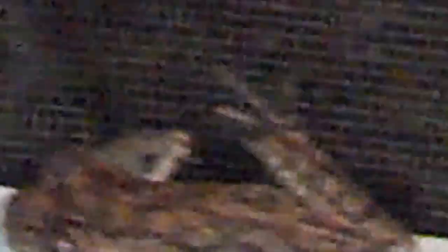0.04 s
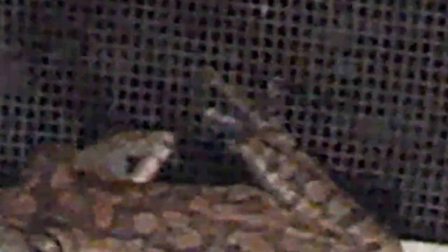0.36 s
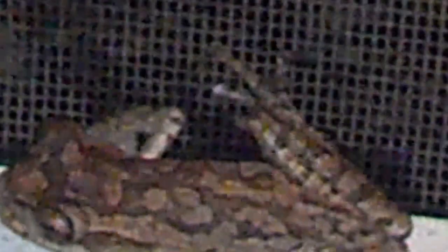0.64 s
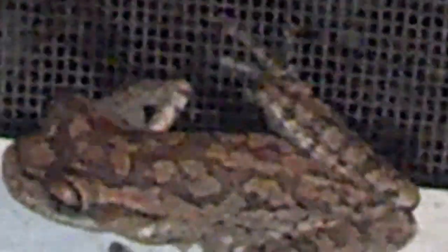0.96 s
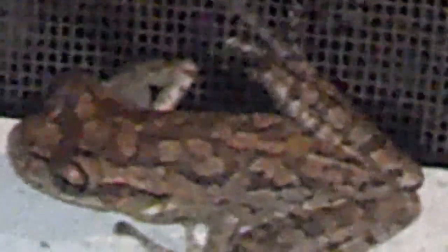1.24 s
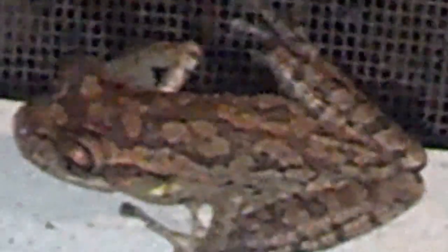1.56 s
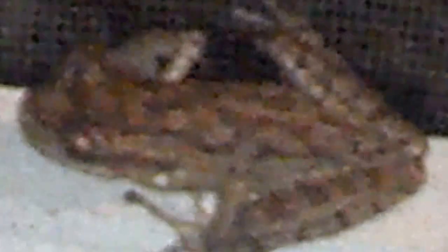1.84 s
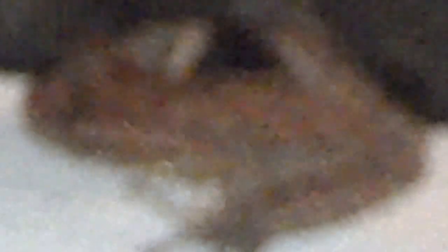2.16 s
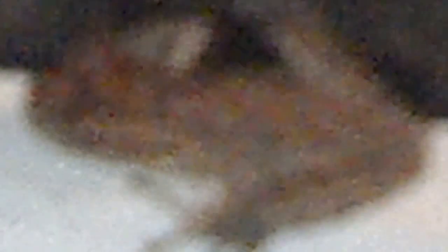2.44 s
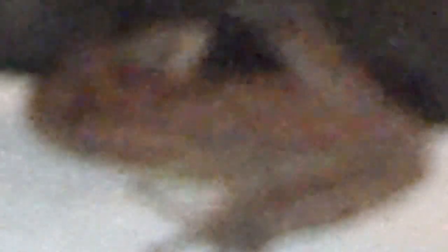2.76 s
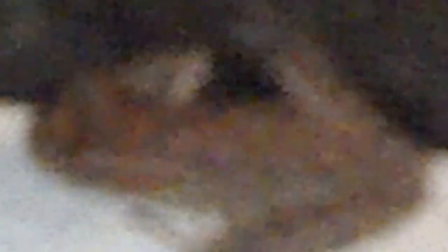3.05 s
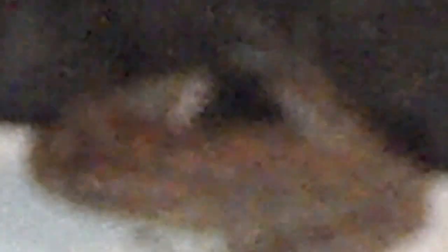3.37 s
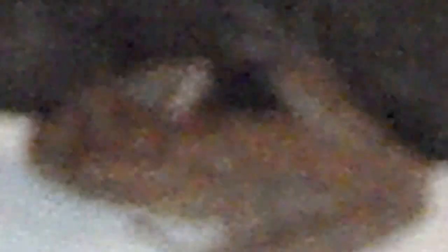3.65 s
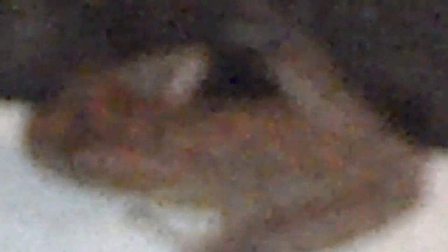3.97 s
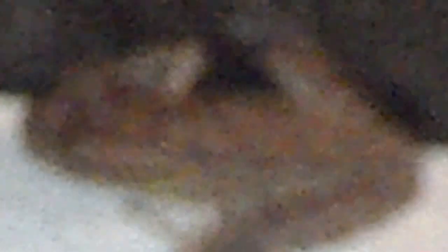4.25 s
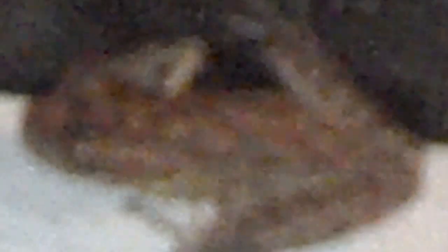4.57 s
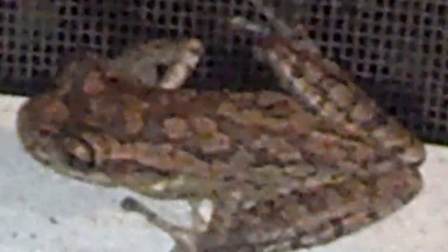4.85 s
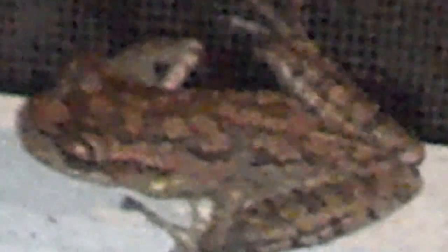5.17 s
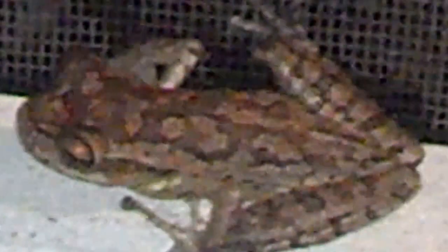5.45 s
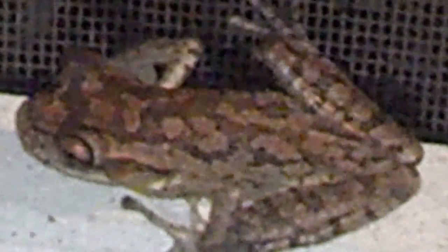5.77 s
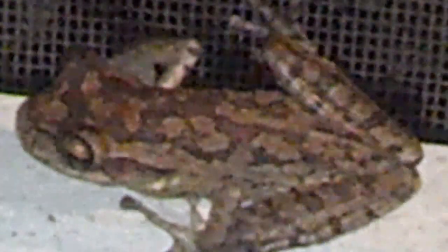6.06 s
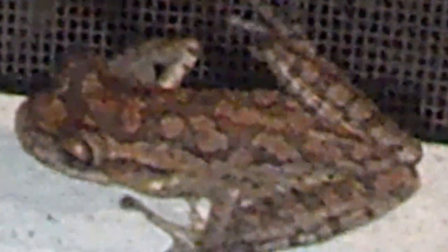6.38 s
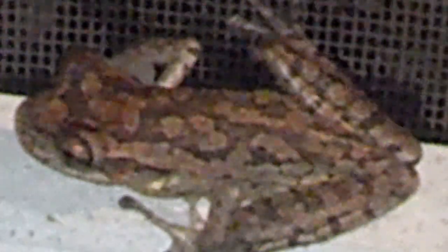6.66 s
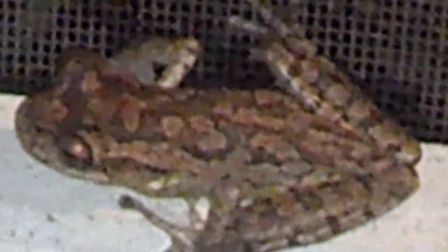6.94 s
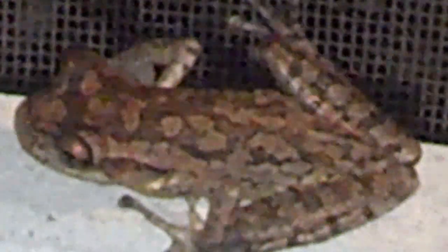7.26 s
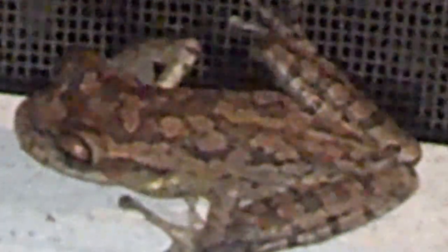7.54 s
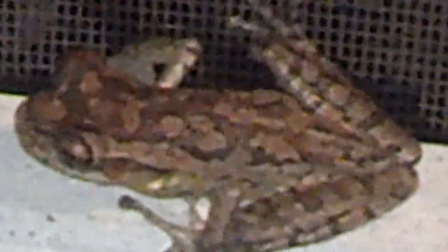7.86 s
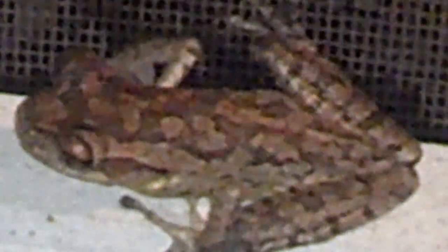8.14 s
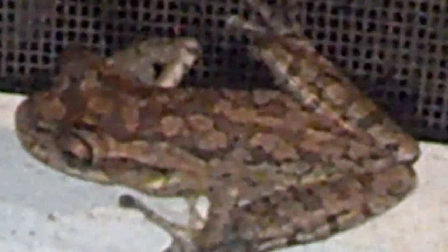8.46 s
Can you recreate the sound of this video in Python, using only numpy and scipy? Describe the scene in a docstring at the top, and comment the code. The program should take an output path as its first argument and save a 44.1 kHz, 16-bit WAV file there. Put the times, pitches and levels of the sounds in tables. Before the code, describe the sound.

A high chorus of crickets trills throughout, swelling about three times a second over a low, quiet outdoor rumble. Tree frogs, nearer the microphone, give short bursts of raspy pulsed notes with pauses between them. Later come brief squeals and separate croaks, until the frogs call almost without a break. House walls add a short echo, and faint ticks and distant peeps dot the night air.

```python
"""A yard by a screened porch at night: tree frogs call in runs of rasping notes, low rising croaks and
a few squeals. Each note is a train of pulses from the voice box that rings the vocal sac, the frog's
throat balloon; the house walls throw the sound back. Behind them a chorus of crickets rubbing their
wings swells about three times a second over a soft rumble, with far peeps and faint ticks nearby."""
import sys
import numpy as np
from scipy import signal
from scipy.fft import rfft, irfft, next_fast_len
from scipy.io import wavfile
from scipy.ndimage import uniform_filter1d

SR = 44100
rng = np.random.default_rng(int(sys.argv[2]) if len(sys.argv) > 2 else 0)


def put_to_file(sound):
    """Save the sound as 16-bit audio at rate SR, in the file named by the first command-line argument."""
    columns = np.atleast_2d(sound).T  # one column per channel
    safe = np.clip(columns, -1, 1)
    whole_steps = np.round(safe * 32767)
    wavfile.write(sys.argv[1], SR, whole_steps.astype(np.int16))


N = 375291
TIME = np.arange(N) / SR

# how the vocal sac rings; the lower its tone, the slacker it is:
# (sac tone [Hz], body boom [dB], share of pure tone [0-1], width of the resonance [Hz])
SAC = [(1020, -1, 0.11, 520), (1200, -16, 0.17, 260), (1510, -26, 0.28, 310), (1720, -27, 0.54, 147),
       (1860, -41, 0.41, 80), (2150, -29, 0.17, 250)]


def frog_calls(lead_s=0.004, croak_rasp_db=0.5, croak_ring_db=-2):
    """All the notes and croaks; how tight the sac is sets their loudness, rasp and high ring."""
    # lone croaks: (start [s], length [s], first sac tone [Hz], last sac tone [Hz], level [dB])
    lone_croaks = [(0.863, 0.051, 1118, 1194, -56.5), (1.048, 0.065, 1600, 1700, -62),
                   (4.726, 0.043, 1835, 1916, -49), (5.754, 0.057, 1279, 1350, -43.5),
                   (6.817, 0.07, 1760, 1710, -41.5), (6.888, 0.035, 1730, 1754, -45),
                   (7.303, 0.077, 1410, 1680, -41), (7.481, 0.049, 1720, 1723, -47.5),
                   (7.545, 0.065, 1718, 1840, -44.5), (7.608, .115, 1413, 1720, -42),
                   (7.699, 0.033, 1850, 1952, -46), (7.783, .059, 2137, 2110, -40.5),
                   (8.004, 0.035, 1883, 1896, -40), (8.092, 0.05, 1760, 1874, -44),
                   (8.477, 0.056, 1353, 1625, -39.5)]
    # the sac is loudest in mid range; when tighter, it tends to rasp and ring more:
    # (sac tone [Hz], level change [dB], rasp [dB], high ring [dB])
    tension = [(1150, -3, -12, -19), (1480, -7, -12.5, -29), (1600, 0, -11, -23), (1730, 0.5, -13, -17.5),
               (1850, -1, -12.5, -13), (1906, -1, -8.5, -10), (2030, -5.5, -3, -15), (2150, -5.5, -12, -5)]
    out = np.zeros(N)
    calls = list(note_runs()) + [(*row, croak_rasp_db, croak_ring_db) for row in lone_croaks]
    for start, length, start_hz, end_hz, level_db, extra_rasp_db, extra_ring_db in calls:
        sac_db, rasp_db, ring_db = curves(tension, (start_hz + end_hz) / 2)
        sound = frog_note(length, start_hz, end_hz, rasp_db + extra_rasp_db, ring_db + extra_ring_db)
        add(out, start - lead_s, from_db(level_db + sac_db) * sound)
    return out


def note_runs(first_note_s=0.063, shorten_s=0.003, opener_db=-6, tiring_db=0.4, pitch_rise=0.014):
    """A frog starts a run softly, pushes hardest on note two, then tires; each note bends up a little."""
    # runs of notes: (start [s], note spacing [s], level [dB], extra rasp [dB], extra high ring [dB],
    # sac tone of each note [Hz])
    runs = [(-0.04, 0.084, -41.5, -2.5, -2, [1620, 1490, 1490]),
            (1.43, 0.1, -42.5, 1, 5, [1618, 2008, 1894, 1694]),
            (2.70, 0.1, -41, 1, 1.5, [1700, 1923, 1918, 1740]),
            (4.835, .100, -42, -1.5, 0, [1573, 1755, 1617, 1610]),
            (5.905, .100, -41, -1, 0.5, [1618, 1789, 1719, 1710, 1835]),
            (6.94, .101, -41.5, 0.5, 2.5, [1594, 1850, 1700, 1767]),
            (8.195, 0.099, -41, 2, 4, [1520, 1860, 1905])]
    for start, spacing, level_db, rasp_db, ring_db, tones in runs:
        for k, tone_hz in enumerate(tones):
            effort_db = opener_db if k == 0 else -tiring_db * (k - 1)
            bend_hz = tone_hz * pitch_rise / 2
            yield (start + k * spacing, first_note_s - k * shorten_s,
                   tone_hz - bend_hz, tone_hz + bend_hz, level_db + effort_db, rasp_db, ring_db)


def frog_note(length, start_hz, end_hz, rasp_db, ring_db, attack_s=0.0082, release_s=0.011, swell=0.15):
    """Pulses from the voice box set the sac, the body and a much higher tone ringing."""
    # tone colour of the rasp: (frequency [Hz], level [dB])
    rasp_colour = [(300, -26), (800, 0.5), (1300, -32.5), (1800, -3), (2300, 11), (2900, 2.5), (3400, 1.5),
                   (3900, -4), (4700, -17), (5500, -32), (8000, -38)]
    t = np.arange(int(SR * (length + 0.035))) / SR
    body_db, pure_share, width_hz = curves(SAC, (start_hz + end_hz) / 2)
    # a slack sac fills slowly: a low croak swells in and bends upward
    slack = np.interp(start_hz, [1250, 1650], [1, 0])
    tone_hz = np.interp(t, [0, length], [start_hz, end_hz]) * (1 - 0.11 * slack * np.exp(-t / 0.018))
    pulses = voice_box(tone_hz, t)
    # a tight sac rings on from pulse to pulse as a nearly pure tone
    tone = np.sqrt(2) * np.sin(wavering_phase(tone_hz, t, waver=0.015, per_s=216))
    buzz = band(resonance(pulses, tone_hz, width_hz), 0.65 * start_hz, max(1.11 * end_hz, 2000))
    sac = rms_one(np.sqrt(pure_share) * tone + np.sqrt(1 - pure_share) * buzz)
    body = from_db(body_db) * band(pulses, 445, 1360)
    rasp = from_db(rasp_db - 0.5) * coloured(pulses, rasp_colour)
    ring_hz = rng.normal(4480, 28)
    ring = from_db(ring_db - 4.5) * band(resonance(pulses, ring_hz, width_hz=71), 3740, 4700)
    # the push of air fades in, bulges in the middle and fades out
    fade_in = np.clip(t / (attack_s * (1 + 0.7 * slack)), 0, 1)
    fade_out = np.clip((length - t) / release_s + 0.76, 0, 1)
    bulge = 1 - swell / 2 + swell * np.sin(np.pi * np.minimum(t / length, 1)) ** 2
    push = fade_in * fade_out * bulge
    # the high ring builds up with the push and lingers after it
    linger = np.clip(t / attack_s, 0, 1) * np.exp(-np.maximum(t - length, 0) / 0.013)
    return shaped(sac, push) + (body + rasp) * push + ring * linger


def voice_box(tone_hz, t, cycles_per_pulse=13, jitter=0.016, breath=0.7):
    """Slightly uneven clicks, each with a puff of breath, blurred by the leaves."""
    pulse_count = np.cumsum(tone_hz / cycles_per_pulse * (1 + jitter * drift(150, t))) / SR
    clicks = np.diff(np.ceil(pulse_count), prepend=0) * from_db(1.1 * drift(133, t))
    puffs = rng.standard_normal(len(t)) * np.exp(-3 * (pulse_count % 1))
    return leaf_blur(rms_one(clicks) + breath * rms_one(puffs))


def frog_squeals(swell_share=0.34, release_s=0.012, sac_width_hz=230, flicker_db=3, flap_db=-9):
    """The voice box breaks into a hoarse tone; the sac lifts the nearest overtone, strain the top ones."""
    # squeals: (start [s], length [s], first pitch [Hz], last pitch [Hz], first sac tone [Hz],
    # last sac tone [Hz], level [dB], lift of the overtones at 3500 Hz [dB], hoarse noise [dB])
    squeals = [(3.295, 0.14, 454.4, 549.3, 1320, 1690, -42, -10, -16),
               (4.424, 0.05, 574, 575, 1010, 1110, -49, -20, -22),
               (4.654, 0.072, 616, 612, 1200, 1200, -46.5, -18, -22),
               (4.688, 0.069, 538, 487.4, 1600, 1490, -43, -18, -19),
               (5.66, 0.078, 566.7, 622, 1150, 1340, -44, -8, -17.5),
               (6.696, 0.061, 749, 761, 1510, 1540, -45, 1.5, -11),
               (6.743, 0.046, 845, 865, 1700, 1720, -43, 0, -7),
               (6.775, 0.062, 768, 777, 2300, 2300, -44, 5, -1),
               (7.698, .075, 1099, 1102, 2210, 2190, -46, -8, -13),
               (7.927, 0.093, 652, 642, 1250, 1710, -47, -1, -25),
               (8.013, 0.085, 516, 548, 1540, 1650, -42, -2, -21)]
    # tone colour of a squeal apart from the sac: (frequency [Hz], level [dB])
    squeal_colour = [(400, -26), (950, -19.5), (1500, -7.5), (2200, -14.5), (2900, -18), (3650, -12),
                     (4400, -23.5), (5180, -11), (5500, -32), (8000, -60)]
    # tone colour of the hoarse noise: (frequency [Hz], level [dB])
    hoarse_colour = [(400, -13), (1000, -10), (2000, 5.5), (2700, 2), (3400, 7.5), (4000, -3), (4600, 3),
                     (5200, -6), (5900, -30), (8000, -50)]
    out = np.zeros(N)
    harmonics = np.arange(1, 9)[:, None]
    for start, length, start_hz, end_hz, sac_start_hz, sac_end_hz, level_db, lift_db, hoarse_db in squeals:
        t = np.arange(int(length * SR)) / SR
        pitch_hz, sac_hz = curves([(0, start_hz, sac_start_hz), (length, end_hz, sac_end_hz)], t)
        phase = wavering_phase(pitch_hz, t, waver=0.012, per_s=328)
        hz = harmonics * pitch_hz
        strain = from_db(lift_db * np.interp(hz, [2000, 3500, 5200], [0, 1, 1.5]))
        sac_lift = 1 / (1 + (2 * (hz - sac_hz) / sac_width_hz) ** 2)
        gains = gain_at(squeal_colour, hz) * strain + sac_lift
        # echoes make each overtone flicker on its own
        gains *= from_db(flicker_db * np.array([drift(122, t) for _ in harmonics]))
        scatter = 0.67 * np.array([drift(100, t) for _ in harmonics])
        voice = np.sum(gains * np.sin(harmonics * phase + scatter), axis=0)
        voice /= np.sqrt(np.sum(gains ** 2, axis=0) / 2)
        voice *= 1 + 0.25 * drift(520, t)   # a fast tremble roughens the tone
        # rushing air hisses, makes the sac flap and, when it is slack, booms in the body
        air = rng.standard_normal(len(t))
        body_db, _, width_hz = curves(SAC, sac_start_hz)
        flap = band(resonance(air, sac_hz, width_hz), 700, 2700)
        boom = from_db(body_db + 7) * band(air, 520, 1120)
        hoarse = from_db(hoarse_db) * coloured(air, hoarse_colour) + from_db(flap_db) * (flap + boom)
        push = np.clip(t / (swell_share * length), 0, 1) * np.clip((length - t) / release_s, 0, 1)
        add(out, start, from_db(level_db) * rms_one(voice + hoarse) * push)
    return out


def leaf_blur(x, decay_s=0.011):
    """Many quick echoes from nearby leaves run the pulses together."""
    t = np.arange(SR // 20) / SR
    echoes = rng.standard_normal(len(t)) * np.exp(-t / decay_s)
    return rms_one(signal.fftconvolve(x, echoes, "same"))


def yard_echoes(x, first_echo_s=0.00607, die_away_s=0.29, echo_db=-2):
    """The direct sound plus scattered echoes from walls and leaves, at the same total power."""
    t = np.arange(SR // 2) / SR
    echoes = rng.standard_normal(len(t)) * from_db(-60 * t / die_away_s) * (t > first_echo_s)
    echoed = signal.fftconvolve(x, echoes / np.sqrt(np.sum(echoes ** 2)))[:N]
    return (x + from_db(echo_db) * echoed) / np.sqrt(1 + from_db(echo_db) ** 2)


def cricket_chorus(level_db=-43.5, chirps_per_s=3.25, strokes_per_s=17.7, octave_db=-35.5):
    """Many crickets merge into one high trill that swells with their chirps and flutters with their wings."""
    # tones of all the wings together: (frequency [Hz], level [dB])
    wing_colour = [(6150, -22.5), (6250, -17), (6330, -6.5), (6500, -5), (6548, 2), (6595, -5), (6625, 1.5),
                   (6660, -5), (6750, -7.5), (6840, -18.5), (6875, -19), (6892, -7.5), (6910, -14.5),
                   (6950, -18.5), (7100, -38)]
    # how well the crickets keep in step: (time [s], depth of the swell [dB], lag behind the beat [s])
    in_step = [(0, 1.5, 0.013), (.7, 1.4, 0.11), (1.0, -0.5, .04), (1.5, 2.5, -.02), (2.4, 2.6, -0.0099),
               (3.1, 0.9, -0.015), (4.5, 2, .005), (5.3, 0.7, .04), (6.3, 2.0, 0.077), (6.9, 0, -0.046),
               (7.9, 1.6, -0.12), (8.5, -0.3, -0.042)]
    wings = coloured(rng.standard_normal(N), [(4500, -120), *wing_colour, (9000, -120)])
    wings /= np.sqrt(uniform_filter1d(wings ** 2, int(0.076 * SR)))   # even out the loudness
    strokes = np.sin(wavering_phase(strokes_per_s, TIME, waver=0.075, per_s=6))
    trill = wings + from_db(octave_db) * band(wings ** 2, 12000, 14500)   # squaring adds the octave
    depth_db, lag_s = curves(in_step, TIME)
    swell_db = depth_db * np.cos(2 * np.pi * chirps_per_s * (TIME - lag_s))
    uneven_db = 0.6 * drift(8, TIME) + 1.27 * drift(40, TIME)
    return from_db(level_db + swell_db + uneven_db) * trill * (1 + 0.1 * strokes)


def lone_cricket(hz=6018, chirp_every_s=0.306, gap_s=0.058, stroke_s=0.016, level_db=-57):
    """One cricket makes two wing strokes to a chirp, each a short pure tone."""
    # spells of chirping: (first chirp [s], end [s])
    bouts = [(1.515, 3.8), (4.08, 8.5)]
    out, t = np.zeros(N), np.arange(-SR // 20, SR // 20) / SR
    for first, end in bouts:
        for chirp in np.arange(first, end, chirp_every_s):
            for middle in (chirp, chirp + gap_s):
                stroke = np.exp(-(t / stroke_s) ** 2) * np.sin(2 * np.pi * rng.normal(hz, 21) * t)
                add(out, middle + t[0], from_db(rng.normal(level_db, 1)) * stroke)
    return out


def far_frog(hz=4430, width_hz=300):
    """Only a far frog's high ring is heard; distance blurs its pulses into a thin band of noise."""
    # loudness of its call: (time [s], level [dB])
    loudness = [(.70, -90), (.73, -69), (.83, -73), (.87, -77), (.94, -63), (1.0, -75), (1.06, -72),
                (1.18, -73), (1.25, -90)]
    ring = band(resonance(rng.standard_normal(N), hz, width_hz), 4000, 4800)
    return from_db(curves(loudness, TIME)[0]) * ring


def far_peeps():
    """Soft, wavering single tones from far away."""
    # thin peeps: (start [s], length [s], pitch [Hz], level [dB])
    peeps = [(1.268, .16, 3620, -71), (3.638, 0.2, 3750, -70)]
    out = np.zeros(N)
    for start, length, hz, level_db in peeps:
        t = np.arange(int(length * SR)) / SR
        tone = np.sin(wavering_phase(hz, t, waver=0.011, per_s=200))
        add(out, start, from_db(level_db) * tone * np.sin(np.pi * t / length))
    return out


def ticks(decay_s=0.006, faint_per_s=1.3, faint_db=-52.5, trim_db=-2):
    """Tiny, bright bursts of noise nearby: a few at set times, faint ones at random."""
    # the set ticks: (time [s], level before the trim [dB])
    set_ticks = [(0.5277, -54), (2.6454, -44), (3.901, -43), (4.6409, -51), (7.3582, -49), (7.7268, -50)]
    # tone colour of a tick: (frequency [Hz], level [dB])
    tick_colour = [(3000, -20), (7000, 0), (10000, -4.5), (13000, -2), (15000, 2), (16000, 5.5)]
    out, t = np.zeros(N), np.arange(SR // 2) / SR
    faint_times = np.cumsum(rng.uniform(0, 2, size=16)) / faint_per_s
    for start, level_db in list(set_ticks) + [(time, faint_db) for time in faint_times]:
        tick = coloured(rng.standard_normal(len(t)), tick_colour) * np.exp(-t / decay_s)
        add(out, start, from_db(level_db + trim_db) * tick)
    return out


def rustles():
    """Soft noise nearby that rises and falls unevenly."""
    # each rustle: (start [s], length [s], level [dB])
    swishes = [(0.519, 0.18, -63.5), (1.124, 0.23, -69)]
    # tone colour of a rustle: (frequency [Hz], level [dB])
    rustle_colour = [(300, -6), (1200, -7), (3000, -9), (6000, -4), (10000, -11), (16000, -20)]
    out, t = np.zeros(N), np.arange(SR // 2) / SR
    for start, length, level_db in swishes:
        swell = np.sin(np.pi * np.minimum(t / length, 1)) * from_db(2.6 * drift(82, t))
        add(out, start, from_db(level_db) * coloured(rng.standard_normal(len(t)), rustle_colour) * swell)
    return out


def bump(hz=520, rise_s=0.0012):
    """One soft knock, so heavily damped that it dies within a few cycles."""
    # the knock: (time [s], peak level [dB])
    knocks = [(3.041, -39)]
    out, t = np.zeros(N), np.arange(SR // 2) / SR
    thump = np.sin(2 * np.pi * hz * t) * (t / rise_s) * np.exp(1 - t / rise_s)
    for start, peak_db in knocks:
        add(out, start, from_db(peak_db) * thump)
    return out


def night_air(air_db=-53.5):
    """Distant rumble, hiss, a little mains hum and a faint whine."""
    # tone colour of the rumble and hiss: (frequency [Hz], level [dB])
    air_colour = [(20, -22), (50, -15), (85, -4.5), (125, 0), (250, -4.5), (450, -9.5), (800, -14.5),
                  (1500, -19), (3000, -26.5), (5500, -26.5), (7400, -22.5), (9000, -30.5), (11500, -38),
                  (15500, -32)]
    # tones of the hum and whine: (frequency [Hz], level [dB])
    hum_tones = [(120, -70.5), (355, -71), (1183, -76)]
    hum = sum(from_db(db) * np.sqrt(2) * np.sin(2 * np.pi * hz * TIME + 0.45 * drift(3.08, TIME))
              for hz, db in hum_tones)
    return from_db(air_db) * coloured(rng.standard_normal(N), air_colour) + hum


def from_db(db):
    """Turn decibels into a number to multiply by."""
    return 10 ** (np.asarray(db) / 20)


def rms_one(x):
    """Scale a sound so its average strength (rms) is 1."""
    return x / np.sqrt(np.mean(x ** 2) + 1e-20)


def shaped(x, envelope):
    """Fade x in and out with an envelope, keeping strength 1 where it is fully open."""
    return envelope * x / np.sqrt(np.sum((envelope * x) ** 2) / np.sum(envelope ** 2))


def curves(rows, at):
    """Look up `at` in a table's first column and read the others, blending between rows."""
    key, *columns = np.transpose(rows)
    return [np.interp(at, key, column) for column in columns]


def gain_at(colour, hz):
    """Gain of a (frequency [Hz], level [dB]) table at any frequency."""
    points, db = np.transpose(colour)
    return from_db(np.interp(np.log(hz + 1e-3), np.log(points), db))


def coloured(x, colour):
    """Give x the tone colour in a table, at strength 1."""
    size = next_fast_len(len(x))
    hz = np.arange(size // 2 + 1) * SR / size
    return rms_one(irfft(rfft(x, size) * gain_at(colour, hz), size)[:len(x)])


def drift(per_s, t):
    """A random curve, mostly within -1 to 1, that heads for a new value `per_s` times a second."""
    targets = rng.standard_normal(4096)
    return np.interp((t - t[0]) * per_s, np.arange(len(targets)), targets)


def wavering_phase(hz, t, waver, per_s):
    """Phase of a tone whose pitch wanders at random by about the fraction `waver`."""
    return 2 * np.pi * np.cumsum(hz * (1 + waver * drift(per_s, t))) / SR


def resonance(x, hz, width_hz):
    """Make x ring at a pitch that may glide: shift that pitch to 0 Hz, smooth, shift back; strength 1."""
    turn = np.exp(2j * np.pi * np.cumsum(hz + np.zeros(len(x))) / SR)
    decay = np.exp(-np.pi * width_hz / SR)
    return rms_one(np.imag(turn * signal.lfilter([1 - decay], [1, -decay], x / turn)))


def band(x, low_hz, high_hz):
    """Keep what lies between two frequencies, at strength 1."""
    return rms_one(signal.sosfilt(signal.butter(2, [low_hz, high_hz], "band", fs=SR, output="sos"), x))


def add(out, start_s, sound):
    """Mix a sound in at a given time, dropping what falls outside the scene."""
    at = round(start_s * SR)
    sound, at = sound[max(-at, 0):], max(at, 0)
    out[at:at + len(sound)] += sound[:max(N - at, 0)]


def scene():
    """Frogs in the yard over crickets, small noises and night air, in one channel."""
    near_frogs = yard_echoes(frog_calls() + frog_squeals())
    far_calls = far_frog() + far_peeps()
    crickets = cricket_chorus() + lone_cricket()
    small_noises = ticks() + rustles() + bump()
    return (near_frogs + far_calls + crickets + small_noises + night_air())[None, :]


def record(dry):
    """Cut off the very highest treble steeply."""
    cutoff_hz, fade_width_hz = 15850, 200
    size = next_fast_len(N)
    hz = np.arange(size // 2 + 1) * SR / size
    gain = np.clip((cutoff_hz - hz) / fade_width_hz + 0.5, 0, 1)
    return irfft(rfft(dry, size) * gain, size)[:, :N]


dry = scene()
out = record(dry)
put_to_file(out)
```